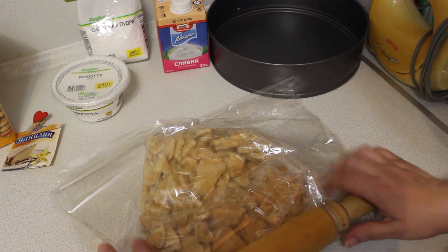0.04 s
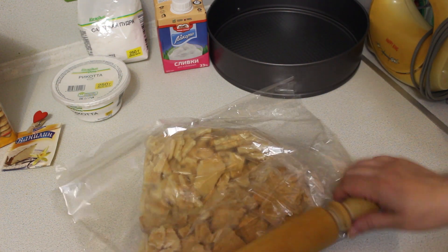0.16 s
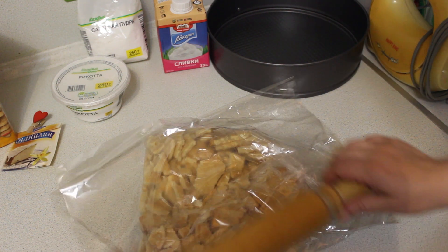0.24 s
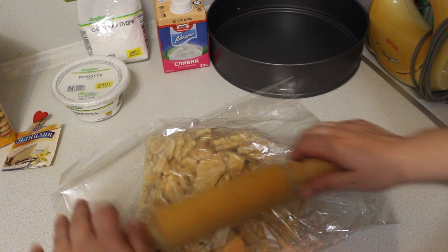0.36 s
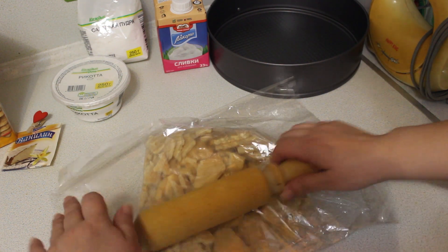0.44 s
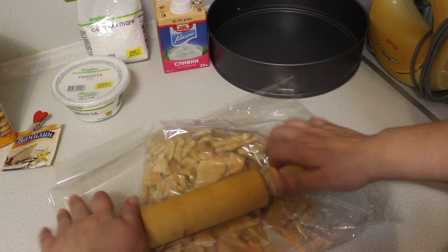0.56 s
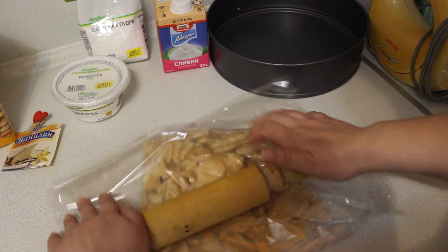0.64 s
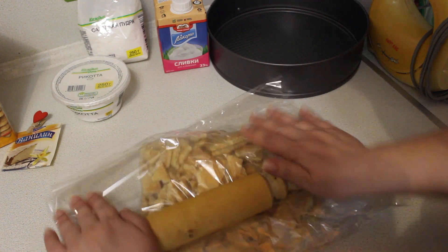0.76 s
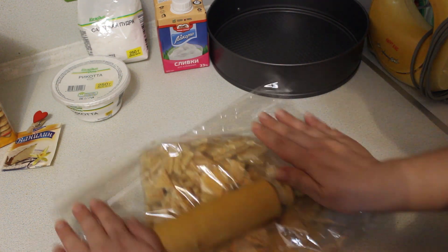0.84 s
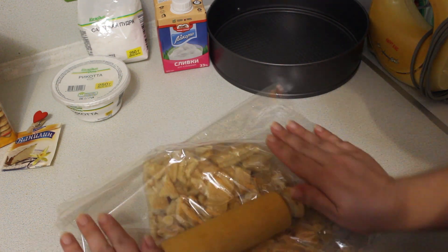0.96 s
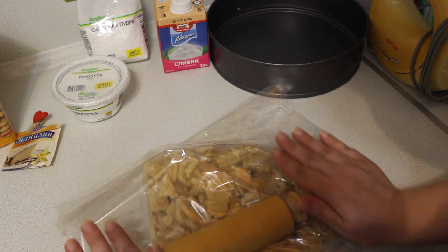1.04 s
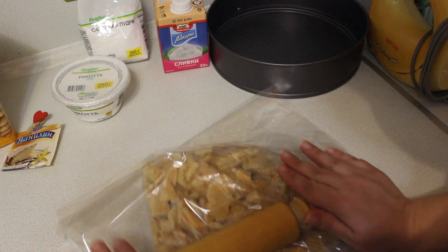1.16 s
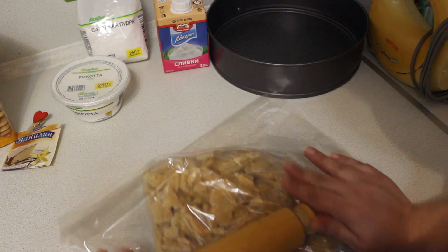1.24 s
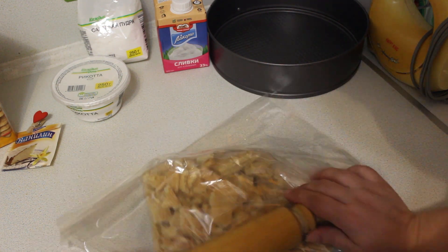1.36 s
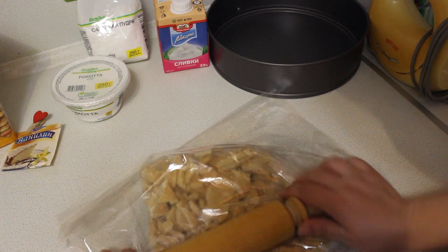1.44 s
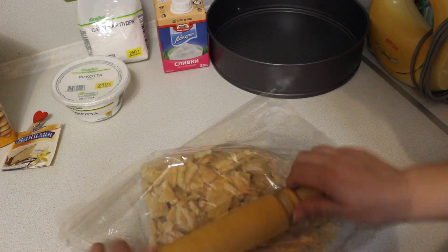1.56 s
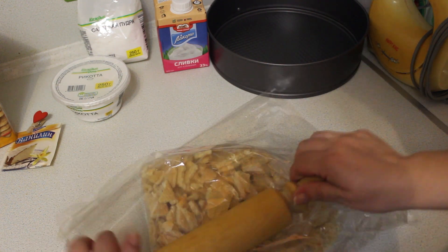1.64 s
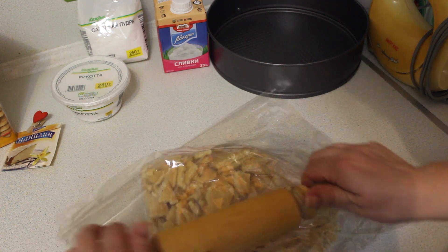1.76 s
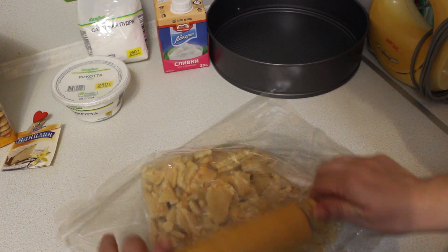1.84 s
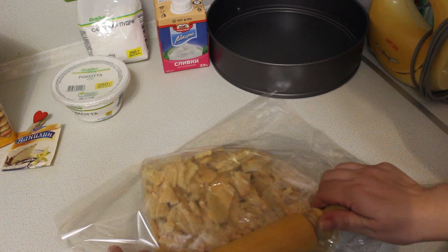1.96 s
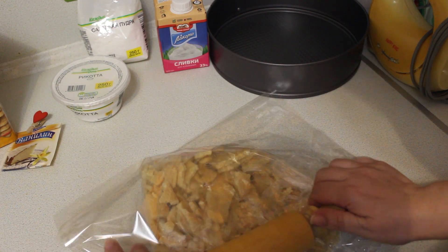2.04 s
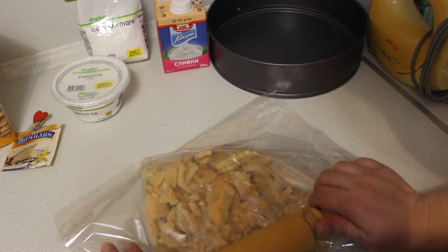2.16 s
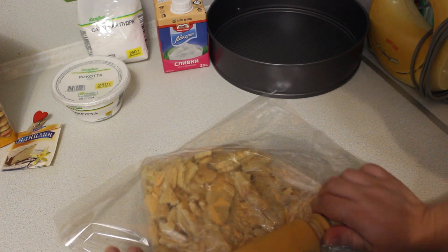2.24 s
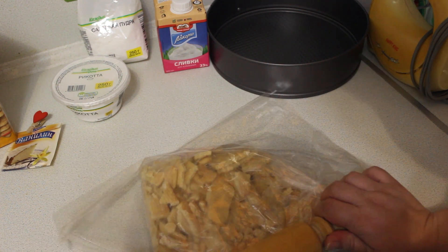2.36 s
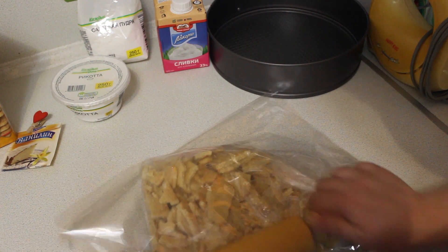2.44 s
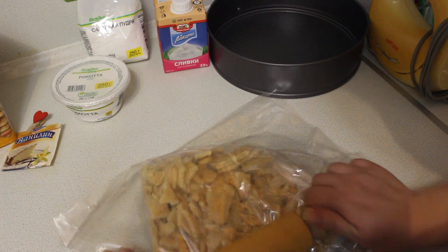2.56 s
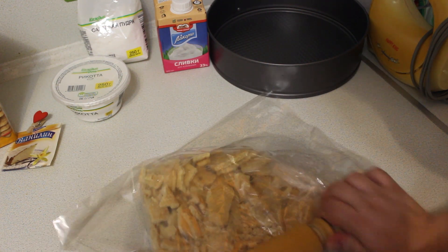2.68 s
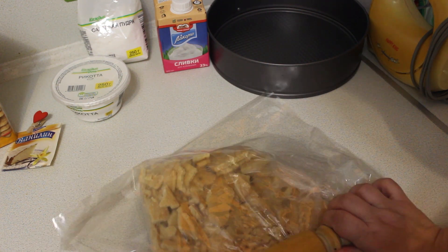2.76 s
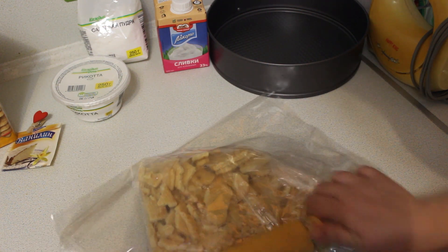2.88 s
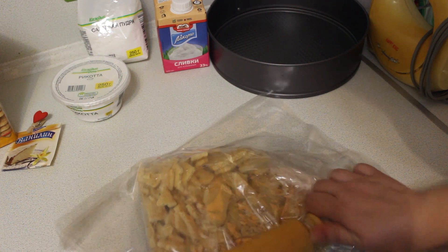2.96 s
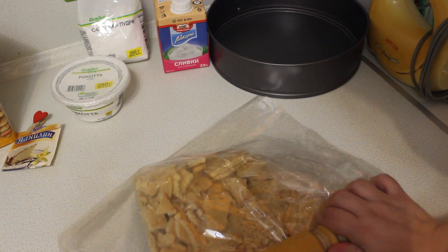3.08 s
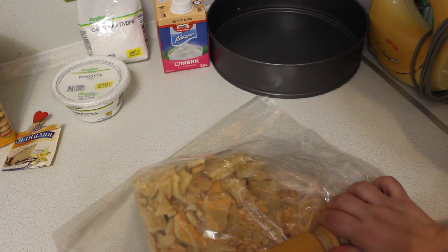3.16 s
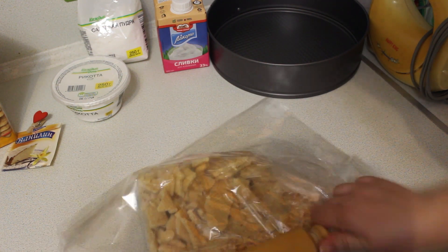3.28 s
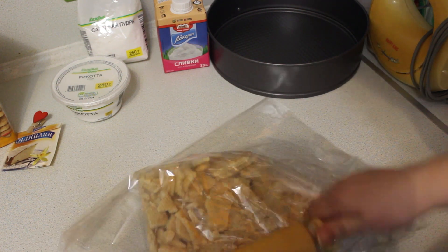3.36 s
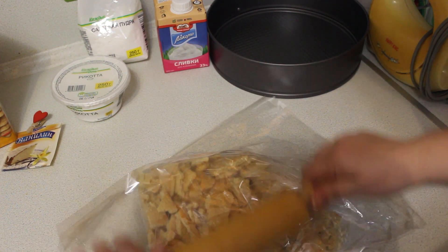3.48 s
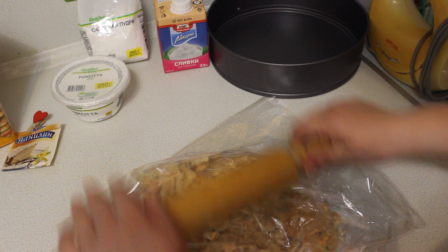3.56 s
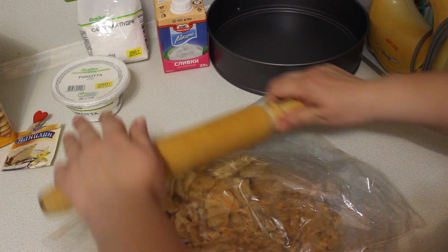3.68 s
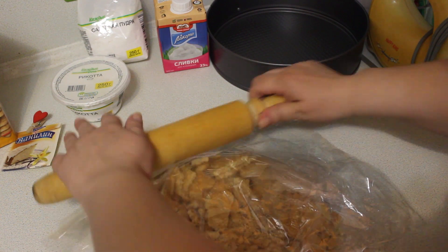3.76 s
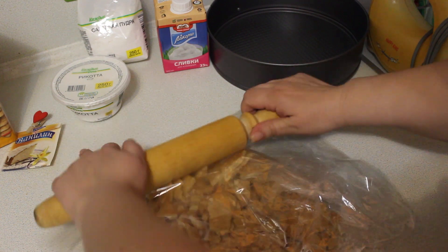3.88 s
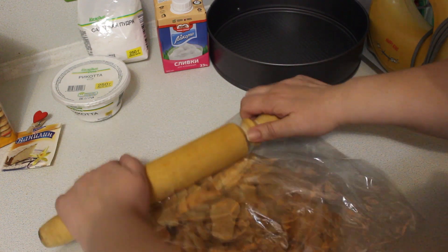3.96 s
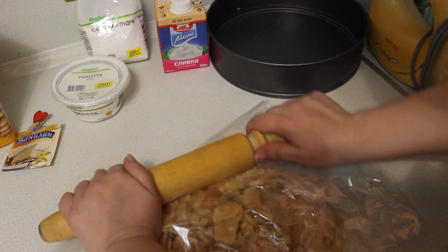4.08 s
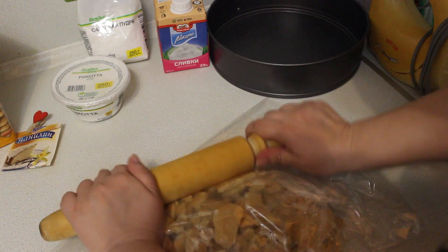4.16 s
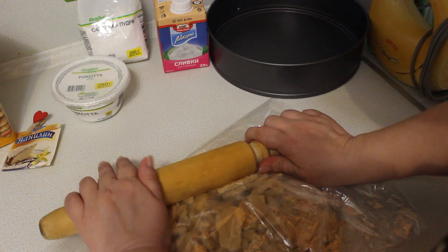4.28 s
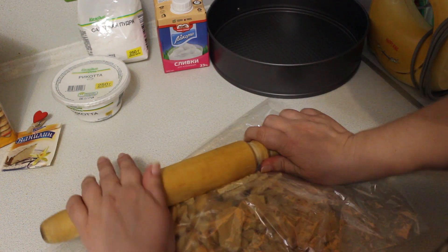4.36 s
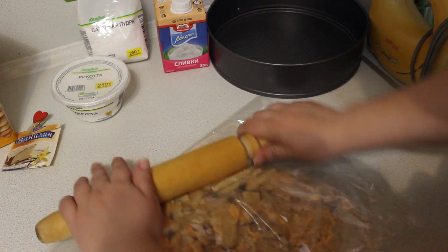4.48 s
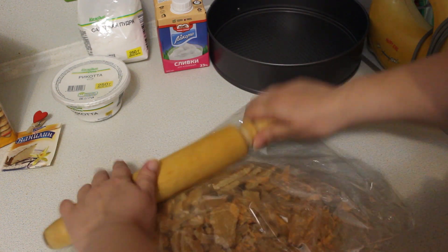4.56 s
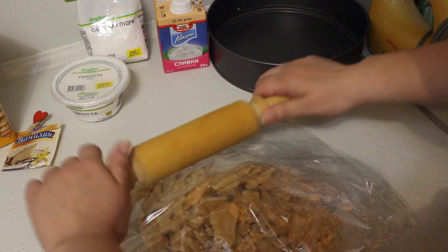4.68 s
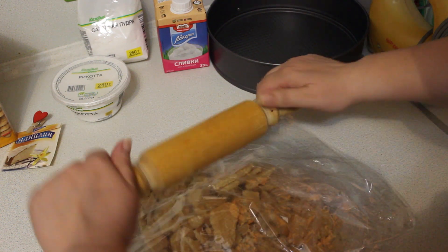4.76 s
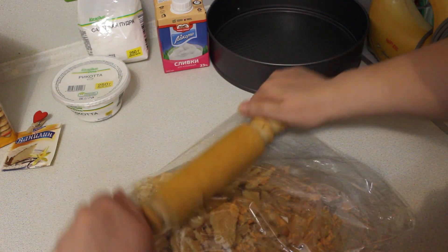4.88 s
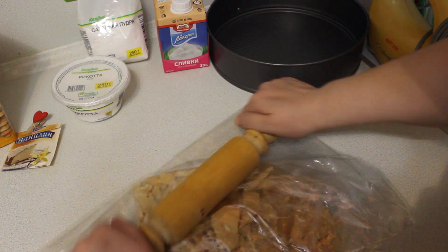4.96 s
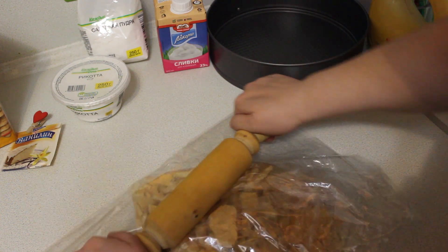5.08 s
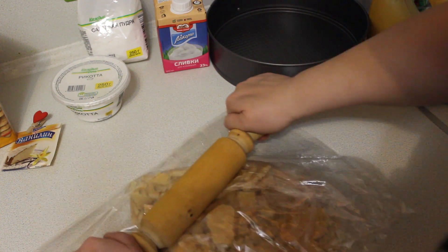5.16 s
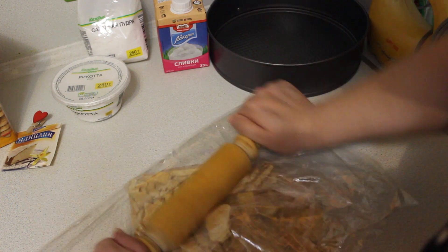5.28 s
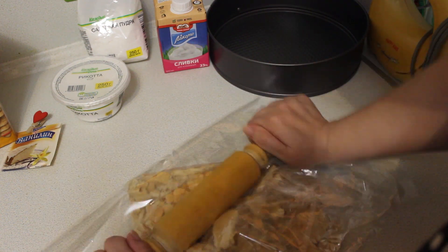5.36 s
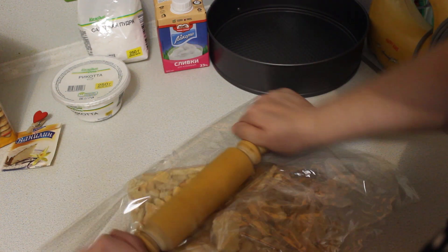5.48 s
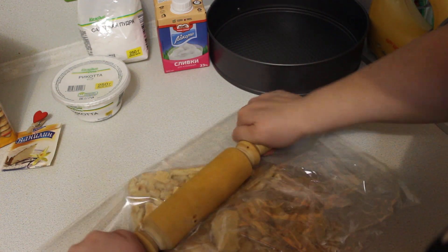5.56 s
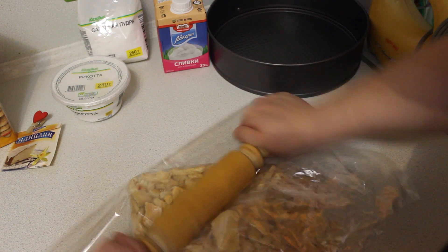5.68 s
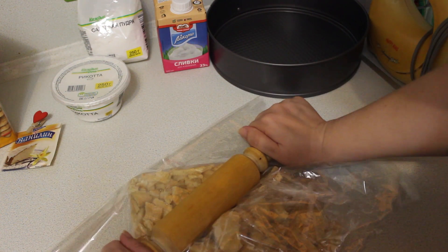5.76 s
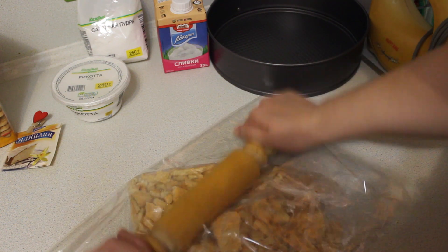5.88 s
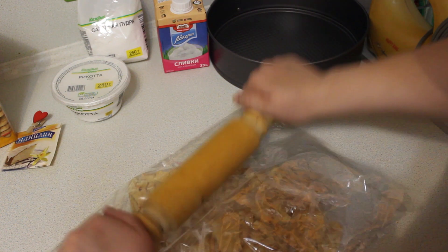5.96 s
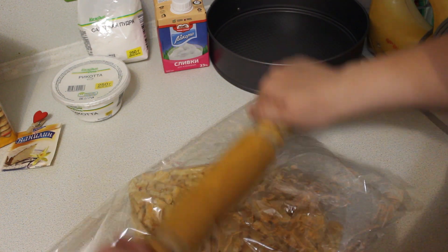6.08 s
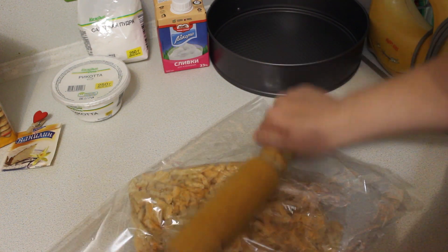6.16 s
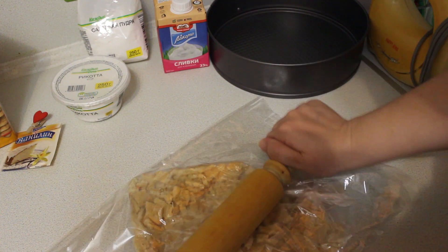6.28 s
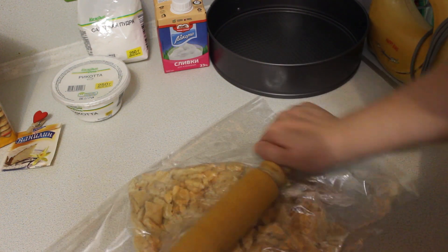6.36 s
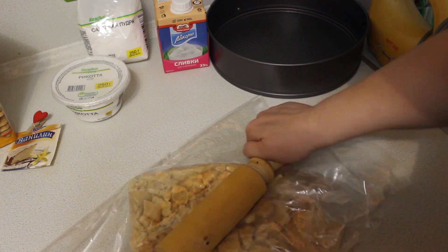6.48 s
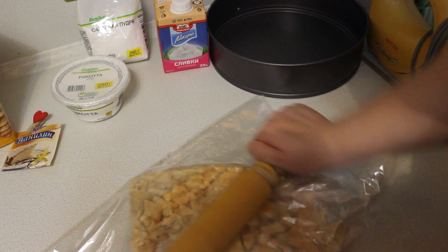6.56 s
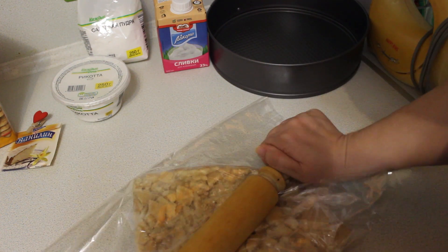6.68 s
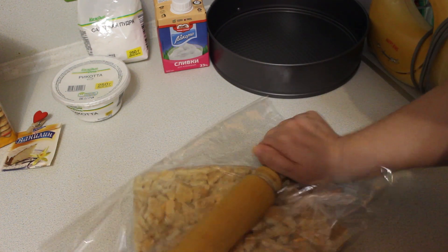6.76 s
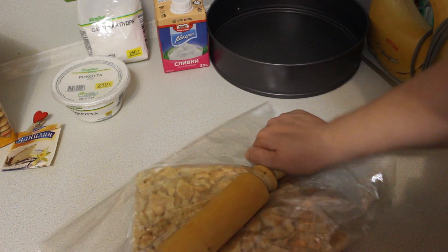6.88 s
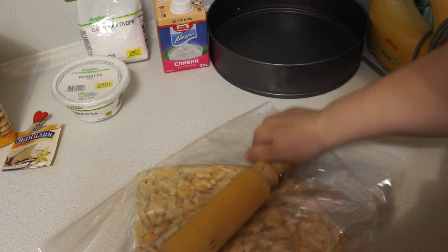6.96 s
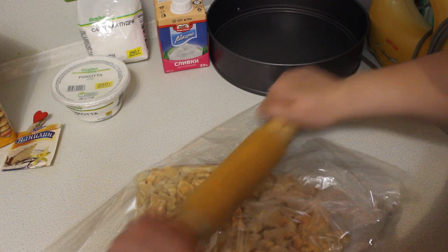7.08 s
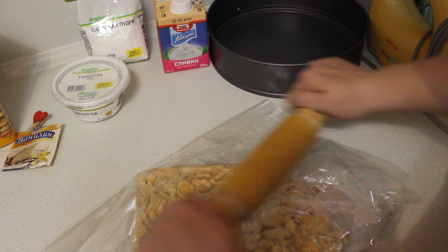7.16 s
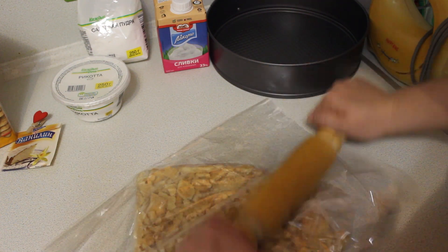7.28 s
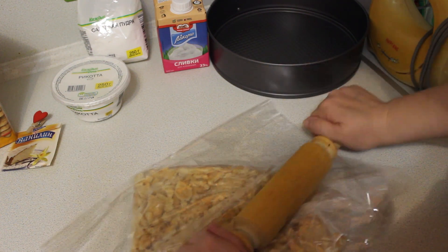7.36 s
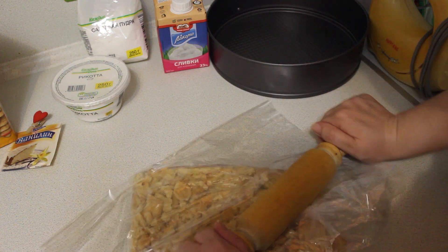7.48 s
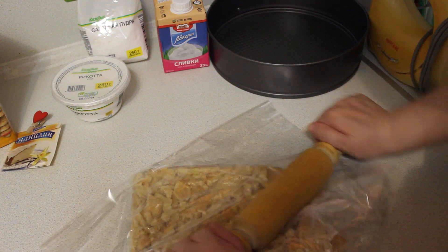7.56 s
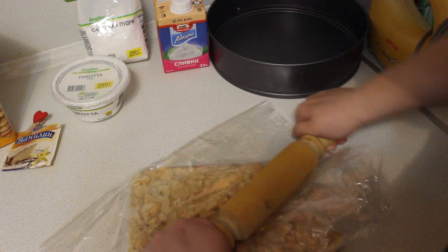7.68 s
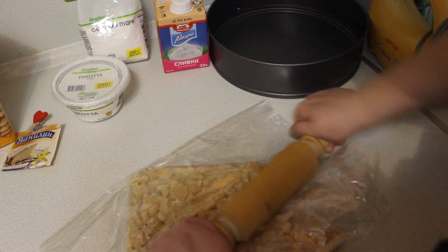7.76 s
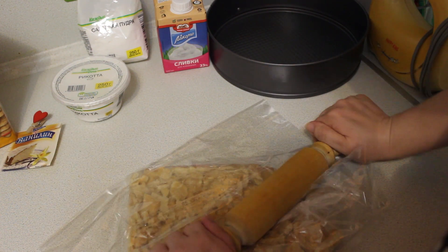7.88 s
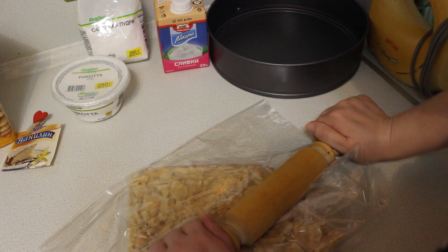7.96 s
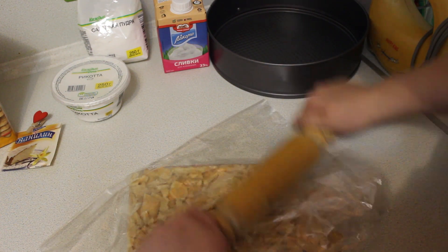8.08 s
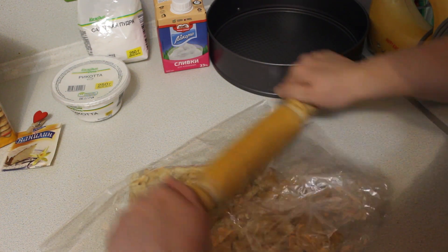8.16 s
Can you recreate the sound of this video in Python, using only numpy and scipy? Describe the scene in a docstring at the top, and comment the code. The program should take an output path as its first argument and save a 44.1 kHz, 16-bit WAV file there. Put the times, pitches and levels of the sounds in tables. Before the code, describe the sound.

A wooden rolling pin crushes cookies in a plastic bag for about eight seconds, in quick, uneven shoves. Each push brings a bright flurry of plastic crinkles over dry cracking and grinding crumbs, with a low rumble as the pin jolts over lumps. Sharp little snaps are scattered throughout, standing out near 1, 2.4, 2.9, 3.4, 6 and 6.7 seconds. The pin bumps softly down on the worktop around 0.2, 2.2, 2.6, 4.2, 5.4, 6.3 and 7.4 seconds. The crunching thins briefly around 3.7 seconds, and everything eases for a moment near 4.8. The rolling is heavier just after 4 seconds, and from 5 seconds the crunching and jolting grow somewhat fuller, continuing to the end. The sound is close and mono, in a small, hard kitchen with a short echo and a very faint appliance hum.

```python
"""Broken cookies in a plastic bag crunch under a wooden rolling pin pushed back and forth.
With each shove the plastic crinkles in tiny pops, the crumbs crack and grind, and the pin jolts over
lumps, making the kitchen worktop rumble. Now and then the pin bumps down, or a fold or a cookie gives
way with a sharp snap. It is heard close up, in mono, in a small, hard kitchen with a faint hum."""
import sys
import numpy as np
from scipy import signal
from scipy.fft import rfft, irfft, next_fast_len
from scipy.io import wavfile
from scipy.ndimage import map_coordinates

SR = 44100
rng = np.random.default_rng(int(sys.argv[2]) if len(sys.argv) > 2 else 0)


def store_wav(level_fs):
    """Save 16-bit WAV to argv[1]."""
    pcm = np.round(np.clip(np.atleast_2d(level_fs), -1, 1) * 32767)
    wavfile.write(sys.argv[1], SR, pcm.T.astype(np.int16))


N = 362766

# each shove of the pin: start/s, length/s, swell from start to end/dB, creasing of the plastic/dB,
# its high sheen relative to the creasing/dB, crumbling/dB, jolting of the pin/dB
SHOVES = [(0.0, 0.056, -12, -38.5, -7.5, -45, -56.0), (0.046, 0.048, 6, -46, -8, -59, -63),
          (0.16, 0.049, -2.0, -38.5, -6.5, -50, -54.5), (0.234, 0.085, -12.5, -36.5, -7.5, -48.5, -53.0),
          (0.323, 0.079, -28, -45, -1.5, -54.5, -58), (0.517, 0.13, -1.0, -39, -6, -46.5, -56.5),
          (0.655, 0.17, 5, -41, -7, -47, -53), (0.872, 0.08, 2, -44.5, -6.5, -51, -56.5),
          (0.96, 0.168, 5.5, -42.5, -3.5, -45, -54.5), (1.134, 0.14, 2.5, -42.0, -7, -47, -54.5),
          (1.326, 0.087, 10, -41.5, -6.5, -46.5, -57.5), (1.442, 0.23, 2, -39.0, -5, -43, -62),
          (1.718, 0.11, 0, -39.5, -6.0, -51.0, -61), (1.904, 0.075, 5.5, -39.5, -7.5, -48.5, -54.5),
          (2.038, 0.021, 6.5, -46.5, -5, -52.5, -57), (2.13, 0.027, 4.5, -45, -12, -47, -51.5),
          (2.232, 0.1, -1, -42, -11, -45.5, -56), (2.357, 0.042, -2.0, -42, -8, -52.5, -56.5),
          (2.458, 0.13, 9, -41.0, -6.5, -45.5, -53.5), (2.632, 0.14, -4, -39, -10, -46.5, -55),
          (2.784, 0.067, -5, -40, -11, -43, -51.5), (2.896, 0.086, 10.5, -41, -7, -46.5, -57),
          (3.061, 0.08, -0.5, -39, -9.5, -47.0, -61), (3.186, 0.035, 1, -42, -13, -52, -58.5),
          (3.268, 0.1, 5.0, -39.5, -6, -44.5, -66), (3.444, 0.15, 5.5, -41.0, -5, -49, -69),
          (3.607, 0.15, 0, -44.0, -7.0, -57.5, -71), (3.762, 0.079, 2, -43, -7.0, -59.0, -64.0),
          (3.875, 0.11, 0.5, -43, -7.0, -47.5, -54), (3.993, 0.057, -1, -38.5, -6.5, -45, -45.5),
          (4.081, 0.22, 8.5, -41.0, -7, -44.5, -48.5), (4.43, 0.15, 6, -42.5, -5.5, -47, -52.5),
          (4.603, 0.11, 3, -42.5, -4, -52.5, -62), (4.795, 0.093, -15.5, -48.5, -7, -59, -67),
          (4.985, 0.13, 4.0, -39.5, -6.0, -45.0, -48), (5.151, 0.072, 1, -40, -5.5, -43.5, -46),
          (5.256, 0.091, 8.5, -43.5, -4, -44.5, -49), (5.36, 0.091, 3.0, -42, -1, -38, -46),
          (5.511, 0.19, 0, -43, -3, -43.5, -53), (5.749, 0.056, 3, -38.0, -6.5, -41.5, -47),
          (5.926, 0.086, 6, -42.5, -5, -48, -67), (6.067, 0.043, -7.5, -42, -11, -61, -64),
          (6.238, 0.056, 6.5, -41.5, -8, -44.5, -45.5), (6.343, 0.22, 4, -42.5, -4.5, -42.5, -49),
          (6.613, 0.073, -0.5, -39, -4, -39.5, -49.5), (6.759, 0.15, 10, -41.5, -6.5, -44.5, -53.5),
          (6.928, 0.1, 0.5, -40.5, -5.5, -48.5, -70), (7.038, 0.12, -1.5, -38, -5, -44, -59),
          (7.292, 0.077, 3.5, -45, -3, -47, -66), (7.366, 0.03, 0.5, -35.5, -5.5, -40, -53.5),
          (7.451, 0.14, 15.5, -49.5, -9, -51.5, -57), (7.64, 0.1, 3.5, -38, -5.5, -38.5, -50.0),
          (7.847, 0.07, 5.5, -39.0, -6.0, -42, -52.5), (8.01, 0.02, -4, -52, -8.0, -47, -65),
          (8.06, 0.165, 7.0, -43.5, -5.5, -48.5, -66)]
# the tone of crinkling plastic, of breaking crumbs and of the quiet room: f/Hz, level/dB
PLASTIC_TONE = [(150, -27), (500, -24.5), (1300, -6.5), (2400, -4), (3300, -0.5), (5000, -2.5),
                (7500, -2.5), (10000, -4.5), (13000, -7), (16000, -12.5)]
CRUMB_TONE = [(120, -28), (400, -1.5), (1300, 3), (2400, -8), (4000, -3), (8000, -7), (16000, -28)]
ROOM_TONE = [(15, -24), (25, -35), (64, -2.5), (98, -2.5), (181, -13.5), (363, 8), (637, -5.5), (4870, -10),
             (10600, -21), (15000, -16)]
# the pitches at which the cookie heap, bag, pin and worktop ring: f/Hz, width/Hz, level/dB
HEAP_RINGS = [(505, 120, -4), (719, 140, -9.5), (840, 54, -1), (1024, 69, 2), (1204, 95, 1.5),
              (1530, 220, -8), (1612, 95, 1.5), (2060, 720, -4)]
BAG_RINGS = [(1375, 167, 4.5), (1604, 250, 1.5)]
PIN_RINGS = [(267.5, 14, -6.5), (341, 69, -6), (410, 28, -7.5), (484, 40, -1), (580, 42, -2), (710, 45, 1)]
WORKTOP_RINGS = [(57.7, 12, -22), (75, 12, -11.5), (103.7, 18, -7.5), (184.1, 13.3, 4), (229, 29, -1.5),
                 (271.5, 15, -5.5)]
# how much of the grinding rasps in the bag, high while the pin works the near edge: t/s, share (0-1)
RASP_SHARE = [(0, 0.56), (.8, 0), (1.3, 0.26), (1.6, 0.44), (2.2, 0.17), (2.7, 0.16), (3.1, 0.7),
              (3.6, 0.6), (3.75, 0.3), (3.95, 0), (5.3, 0.15), (6.5, 0.23), (7.5, 0.25), (8.2, 0.03)]
# how much jolting reaches the worktop, little on a thick bed of cookies: t/s, level/dB
WORKTOP_LOAD = [(0, 3), (0.2, -20), (0.55, -8), (0.7, -7.5), (1.25, -6), (1.6, -6), (1.9, -11), (2.1, -4),
                (3.3, -2.5), (3.7, -8), (4.05, -15), (4.25, -8.5), (5.1, -11), (5.5, -7.5), (6.0, -12),
                (6.45, -3), (7.1, -10.5), (7.5, -4.5), (7.9, -4.5), (8.2, -13.5)]
# how long the kitchen echoes (t60 is the time to fade by 60 dB): f/Hz, t60/s
ROOM_FADE = [(100, 0.85), (500, 0.13), (3000, 0.57), (8000, 0.093), (15000, 0.35)]
# the pin bumps down through the crumbs: t/s, relative level/dB, f/Hz
BUMPS = [(0.222, -28.5, 290), (2.151, -31.5, 120), (2.258, -42, 129), (2.572, -33, 200), (4.189, -31, 450),
         (4.211, -33, 90.6), (5.401, -32, 84), (5.798, -40, 84), (6.28, -42, 400), (6.29, -31, 105),
         (6.377, -36, 109), (6.468, -33, 109), (7.395, -35, 96)]
# a fold or a cookie gives way: t/s, level/dB, f/Hz, relative level of the crackle that follows/dB
SNAPS = [(0.2604, -30, 5200, -7), (0.356, -25, 10000, -13), (0.5265, -40, 3700, -3),
         (0.544, -35.5, 4200, 1), (0.987, -24.5, 8500, -10.5), (1.2447, -24, 6800, -11),
         (1.3744, -29, 4900, -4), (1.968, -25.5, 4000, -7), (2.262, -29, 3500, -7),
         (2.311, -31.5, 4930, -9), (2.3972, -30, 5300, -16), (2.409, -22, 8900, -18),
         (2.481, -32.5, 7300, -5), (2.4963, -34, 7400, -20), (2.7792, -26, 3500, -8.5),
         (2.9033, -22.5, 3320, -14), (3.251, -31, 4100, -10), (3.374, -18.5, 7800, -11),
         (3.53, -28, 8200, -8), (3.564, -27, 8000, -3), (3.704, -30, 7260, -0.5), (3.882, -29.5, 2500, -4),
         (4.03, -29, 4900, -14), (4.721, -24.5, 6000, -8), (4.9395, -39, 6900, -8), (4.947, -31, 8760, -18),
         (5.0029, -32, 6800, -13), (5.178, -30, 4500, -8), (5.333, -29, 7000, -1), (5.762, -25, 8000, -9),
         (5.9796, -23.5, 5140, -4), (6.2374, -39, 8500, -2), (6.6995, -18.5, 9900, -13.5),
         (7.396, -27, 5000, -6), (7.6563, -37, 4470, -13), (7.9, -28, 5000, -5)]

ATTACK_S, EASE_T60_S = 0.031, 0.092  # a shove takes hold quickly and drops as the hands ease off
SETTLE_SHARE = 0.57  # the part of its power that is left to fade slowly
SETTLE_T60_S, PIN_T60_S = 0.6, 0.44  # the crumbs settle; the pin comes to rest sooner
HUM_HZ, SHEEN_HZ, TOP_HZ = 345, 8300, 15850


def amp(db):
    """Turn decibels into a number to multiply by."""
    return 10 ** (np.asarray(db) / 20)


def unit(x):
    """Scale x to an average power of 1."""
    return x / np.sqrt(np.mean(x ** 2) + 1e-20)


def along(points, hz):
    """Read between a table's frequencies, giving each octave equal room."""
    f, values = np.transpose(points)
    return np.interp(np.log(hz + 1), np.log(f), values)


def curve(points):
    """Join (time, value) points with straight lines, one value per sample."""
    return np.interp(np.arange(N) / SR, *np.transpose(points))


def wobble(rate):
    """A smooth random curve through rate points a second."""
    return map_coordinates(rng.standard_normal(N // 20), [np.arange(N) * rate / SR], mode="wrap")


def add(track, start_s, sound):
    """Mix a sound into a track at the given time."""
    part = track[max(round(start_s * SR), 0):][:len(sound)]
    part += sound[:len(part)]


def filtered(x, response):
    """Multiply each frequency in x by response(hz)."""
    size = next_fast_len(N + SR // 2)
    return irfft(rfft(x, size) * response(np.fft.rfftfreq(size, 1 / SR)), size)[:N]


def coloured(x, tone):
    """Give x the tone in a table while clicks keep their sharp starts."""
    size = 2 ** 12
    gains = amp(along(tone, np.fft.rfftfreq(size, 1 / SR)))
    cepstrum = irfft(np.log(gains))
    cepstrum[1:size // 2] *= 2  # fold the filter so it rings only after a click, never before
    cepstrum[size // 2 + 1:] = 0
    return signal.fftconvolve(x, irfft(np.exp(rfft(cepstrum))))[:N]


def resonate(x, rings):
    """Let x shake an object that rings at its own pitches."""
    return filtered(x, lambda f: sum(
        (-1) ** k * amp(db) * 1j * f * width / (hz * hz - f * f + 1j * f * width)
        for k, (hz, width, db) in enumerate(rings)))


def crackle(rate, spread_db):
    """Tiny cracks at random moments, about rate a second; spread_db sets how much their sizes vary."""
    happens = rng.random(N) < rate / SR
    size = amp(spread_db * np.clip(rng.standard_normal(N), -2, 2)) * rng.choice([-1, 1], N)
    return unit(happens * size / np.sqrt(rate + 1))


def shoving(levels_db, t60):
    """Strength over time: each shove takes hold, grows or shrinks, eases off and settles."""
    t = np.arange(0, N / SR, 0.002)
    power = np.zeros(len(t))
    for (start, length, swell_db, *_), db in zip(SHOVES, levels_db):
        progress = np.clip((t - start) / length, 0, 1)
        push = np.clip((t - start) / ATTACK_S, 0, 1) * amp(db + swell_db * (progress - .5))
        after = np.clip(t - start - length, 0, 2)
        easing = (1 - SETTLE_SHARE) * amp(-60 * after / EASE_T60_S) ** 2
        settling = SETTLE_SHARE * amp(-60 * after / t60) ** 2
        power += push ** 2 * (easing + settling)
    return np.interp(np.arange(N) / SR, t, np.sqrt(power + 1e-12))


def bag_crinkle():
    """Creases pop in flurries; harder creasing makes more pops, and tight plastic sounds brighter."""
    *_, creasing_db, sheen_db, _, _ = np.transpose(SHOVES)
    effort = shoving(creasing_db, SETTLE_T60_S)
    sheen = shoving(creasing_db + sheen_db, SETTLE_T60_S)
    pops = crackle(rate=4200 * np.sqrt(unit(effort)), spread_db=3)
    pops *= amp(1.46 * wobble(170) + 0.77 * wobble(40))
    rub = amp(-4) * rng.standard_normal(N)  # plastic sliding over plastic and crumbs
    # one fold tips its neighbours: a thin spray of clicks that starts at once and quickly dies
    folds = crackle(rate=32, spread_db=0.5) ** 2
    flurries = signal.lfilter([1], [1, -np.exp(-1 / (0.0072 * SR))], folds)
    clicks = np.sqrt(flurries) * crackle(rate=5000, spread_db=18)
    spray = amp(-6) * unit(np.diff(clicks, prepend=0))
    crinkle = unit(coloured(pops + rub + spray, PLASTIC_TONE))
    treble = filtered(crinkle, lambda hz: 1 / (1 + (SHEEN_HZ / (hz + 1)) ** 6))
    return amp(-1) * (effort * (crinkle - treble) + amp(5) * sheen * treble)


def cookie_crunch():
    """Crumbs break, and their grinding makes the heap and the bag ring."""
    *_, crumbling_db, _ = np.transpose(SHOVES)
    effort = shoving(crumbling_db, SETTLE_T60_S)
    breaks = crackle(rate=1800 * np.sqrt(unit(effort)), spread_db=4) * amp(0.39 * wobble(70))
    surges = amp(2.1 * wobble(45))  # lumps collapse one after another
    grinding = crackle(rate=3500, spread_db=3) * surges
    scraping = crackle(rate=2000, spread_db=2) * surges
    share = curve(RASP_SHARE)
    heap = np.sqrt(1 - share) * unit(resonate(grinding, HEAP_RINGS))
    rasp = np.sqrt(share) * unit(resonate(scraping, BAG_RINGS))
    return effort * (amp(-4) * unit(coloured(breaks, CRUMB_TONE)) + amp(-3) * (heap + rasp))


def rolling_rumble():
    """The pin jolts over lumps, shaking itself and the worktop."""
    *_, jolting_db = np.transpose(SHOVES)
    pin = amp(-1) * unit(resonate(crackle(rate=1600, spread_db=3), PIN_RINGS))
    worktop = amp(0.5) * unit(resonate(crackle(rate=500, spread_db=7.5), WORKTOP_RINGS))
    return shoving(jolting_db, PIN_T60_S) * (pin + amp(curve(WORKTOP_LOAD)) * worktop)


def background():
    """Quiet room noise and the faint hum of an appliance."""
    hum = np.sqrt(2) * np.sin(2 * np.pi * HUM_HZ * np.arange(N) / SR + .3 * wobble(3.6))
    return amp(-67.5) * unit(coloured(rng.standard_normal(N), ROOM_TONE)) + amp(-74) * hum


def blurred_echoes(x, db, t60, top_hz):
    """Each crease pops in its own place, so the echoes blur into a fading hiss, duller above top_hz."""
    keep = amp(-120 / (t60 * SR))  # energy left after one sample
    energy = signal.lfilter([1 - keep], [1, -keep], x ** 2)
    hiss = coloured(rng.standard_normal(N), PLASTIC_TONE)
    dulled = filtered(hiss, lambda hz: 1 / np.hypot(1, hz / top_hz))
    return amp(db) * np.sqrt(np.abs(energy)) * unit(dulled)


def click_echo(early_db, tail_db):
    """The room's answer to one click: quick echoes off worktop, tins and wall, and a fading tail."""
    hz, t, noise = signal.stft(rng.standard_normal(SR // 3), SR, nperseg=256)
    fade = amp(-60 * t / along(ROOM_FADE, hz)[:, None])
    _, tail = signal.istft(noise * fade, SR, nperseg=256)
    t = np.arange(len(tail)) / SR
    early = rng.standard_normal(len(t)) * (rng.random(len(t)) < .05) * amp(-60 * t / 0.035)
    echo = amp(early_db) * early / np.linalg.norm(early) + amp(tail_db) * tail / np.linalg.norm(tail)
    return np.pad(echo, (SR // 1000, 0))


def kitchen_echoes(x, early_db, tail_db, stretches):
    """The echoes change as pin and hands move, so each short stretch of x gets its own."""
    echoes, hop = np.zeros(N), N // stretches + 1
    for start in range(0, N, hop):
        add(echoes, start / SR, signal.fftconvolve(x[start:start + hop], click_echo(early_db, tail_db)))
    return echoes


def pin_bumps():
    """The pin drops through the crumbs: the worktop thuds and the pin knocks."""
    thuds, knocks = np.zeros((2, N))
    t = np.arange(SR // 12) / SR
    for start, db, hz in BUMPS:
        blow = amp(db + 5) * np.sin(2 * np.pi * hz * t) * np.exp(-hz * t / 0.51)
        add(thuds, start, blow)
        add(knocks, start, blow * hz / 220)  # the harder the contact, the more the pin itself sounds
    return resonate(thuds, WORKTOP_RINGS) + resonate(knocks, PIN_RINGS)


def snaps():
    """A fold or cookie gives way: a sharp click, splintering crumbs and a run of cracks in the plastic."""
    clicks, splinters, runs = np.zeros((3, N))
    t = np.arange(SR // 4) / SR
    for start, db, hz, crackle_db in SNAPS:
        cycles = hz * t
        pulse = 2 * cycles * np.exp(1 - 2 * cycles)  # lasts only a wave or two
        add(clicks, start, amp(db) * np.sin(2 * np.pi * cycles) * pulse)
        add(splinters, start, amp(db + crackle_db - 14 - 60 * t / 0.064))
        add(runs, start, amp(db + crackle_db - 4 - 60 * t / 0.061))
    cookie = unit(coloured(crackle(rate=3000, spread_db=2), CRUMB_TONE))
    plastic = unit(coloured(crackle(rate=6000, spread_db=1), PLASTIC_TONE))
    return clicks + splinters * cookie + runs * plastic


def scene():
    """Bag, cookies, pin and worktop in the kitchen, the same in both channels."""
    crisp = bag_crinkle() + snaps()
    body = cookie_crunch() + rolling_rumble() + pin_bumps()
    near = blurred_echoes(crisp, db=-5.5, t60=0.055, top_hz=18000)  # off the worktop and tins
    far = blurred_echoes(crisp, db=-12, t60=0.35, top_hz=9000)  # off the walls
    room = kitchen_echoes(body, early_db=-13, tail_db=-7.5, stretches=100)
    mono = crisp + near + far + body + room + background()
    return np.array([mono, mono])


def record(dry):
    """Cut away the highest treble, above TOP_HZ."""
    return np.array([filtered(channel, lambda hz: hz < TOP_HZ) for channel in dry])


dry = scene()
out = record(dry)
store_wav(out)
```